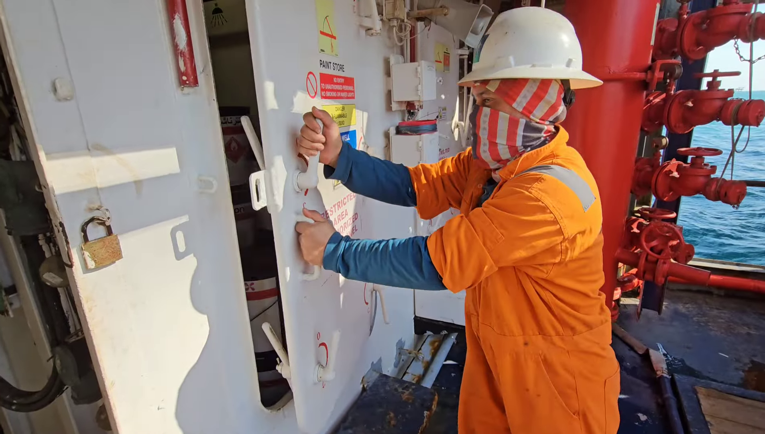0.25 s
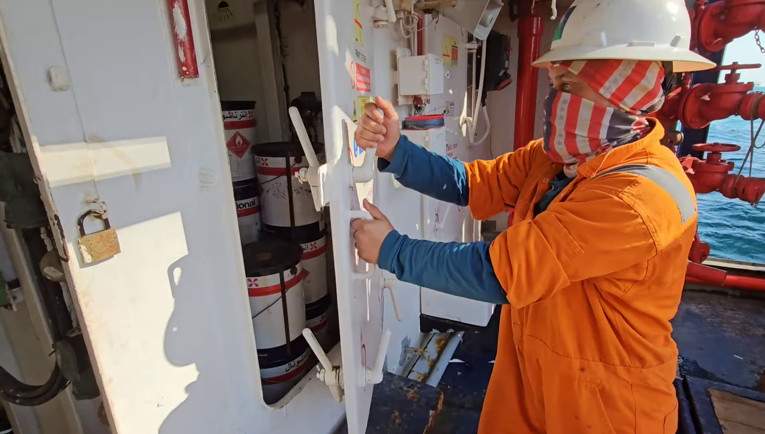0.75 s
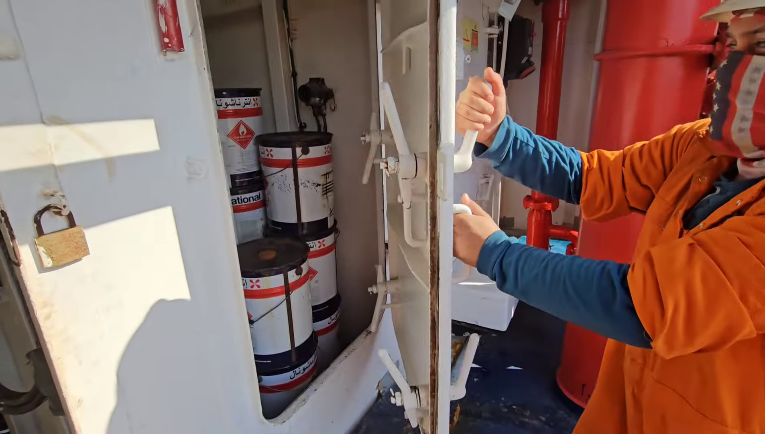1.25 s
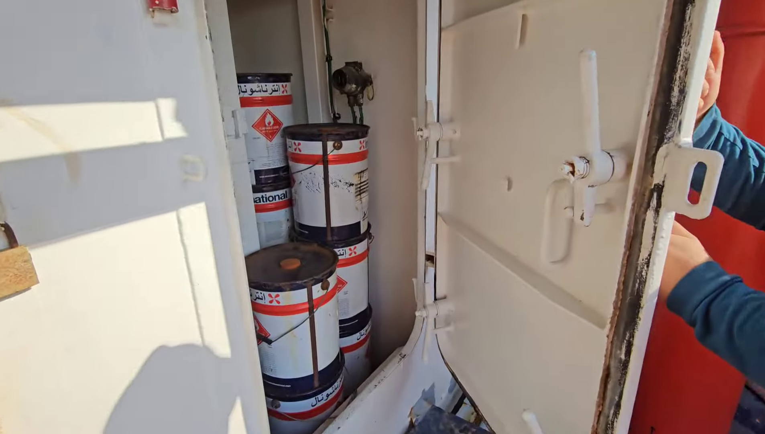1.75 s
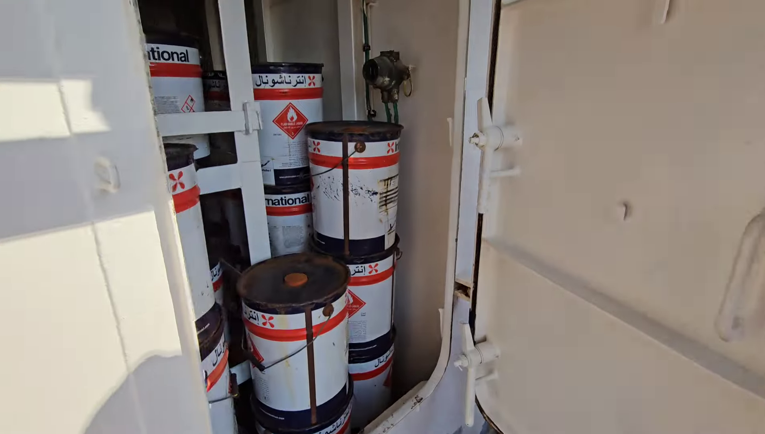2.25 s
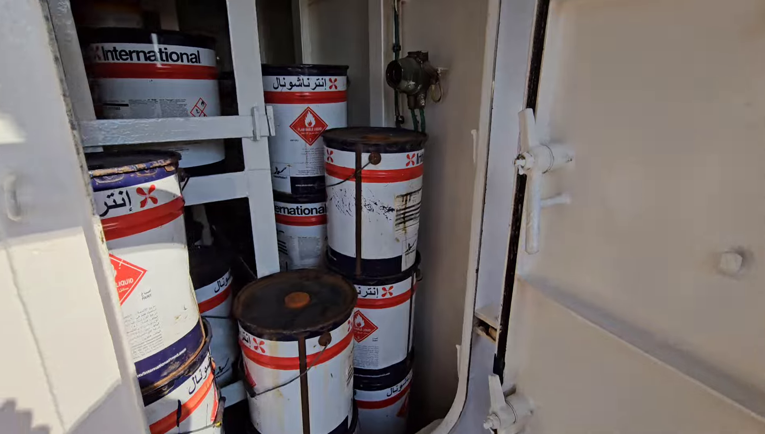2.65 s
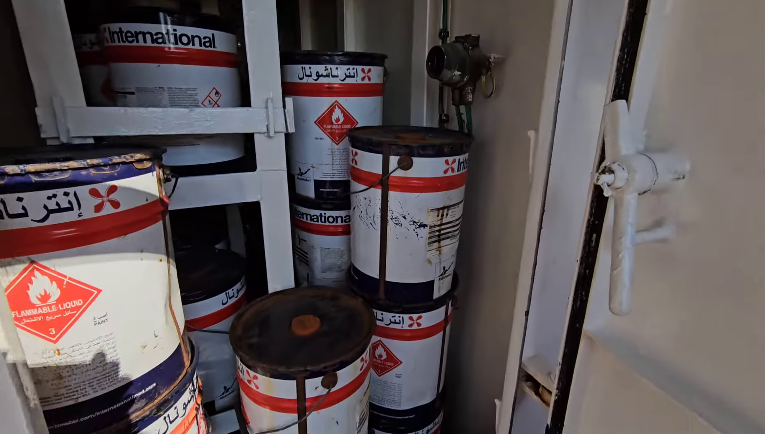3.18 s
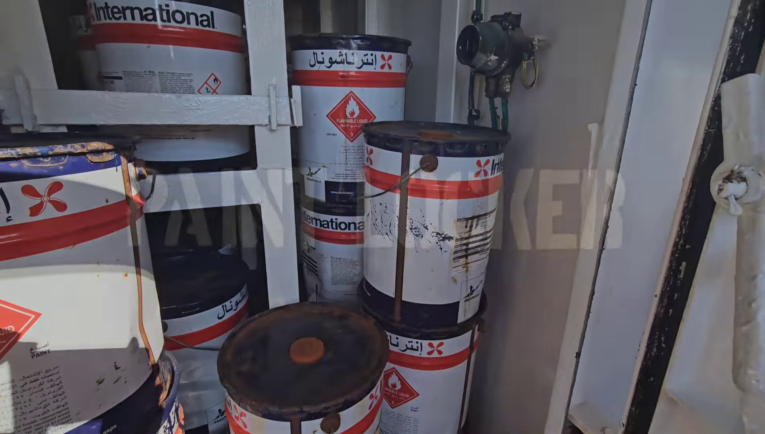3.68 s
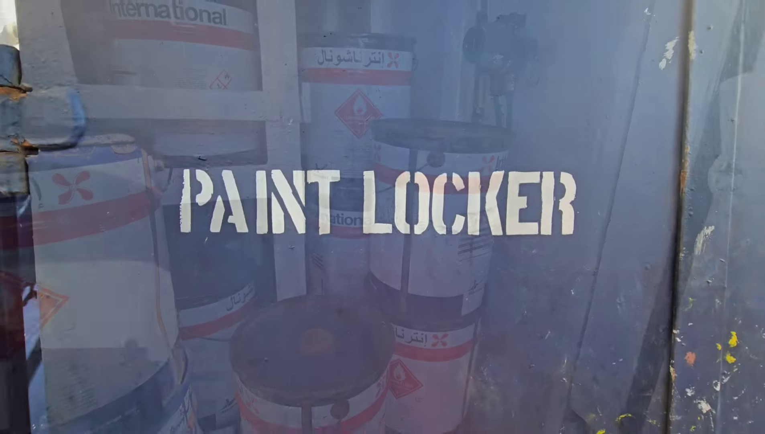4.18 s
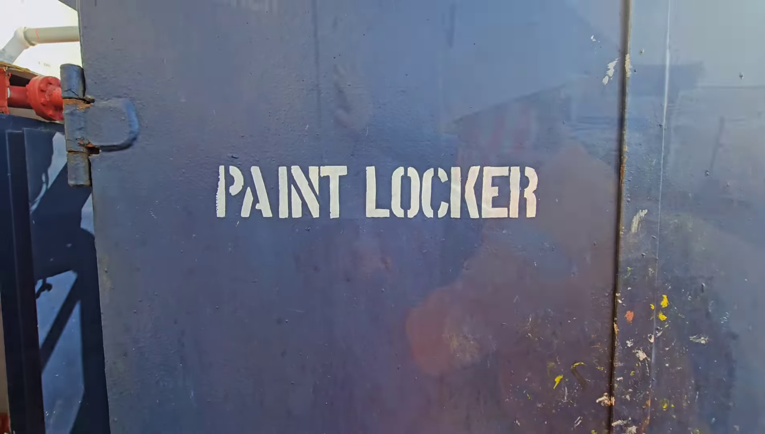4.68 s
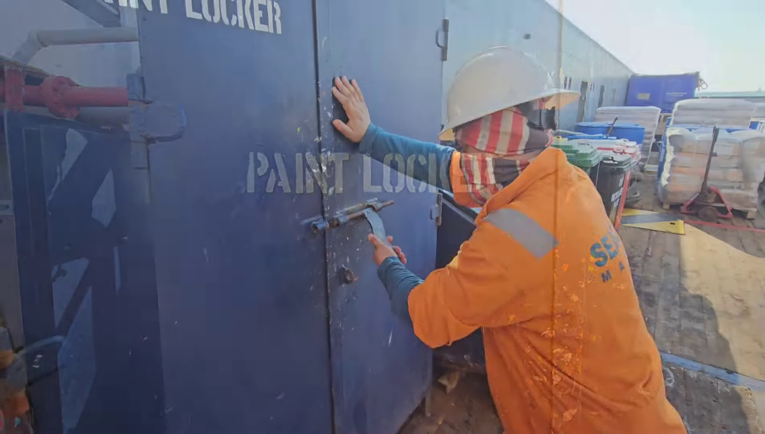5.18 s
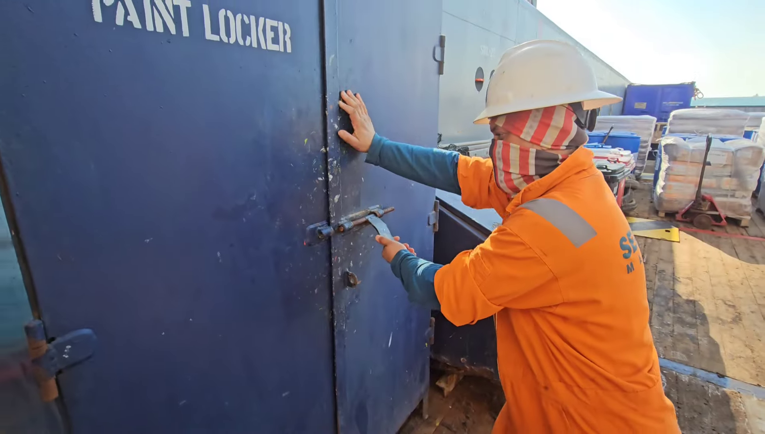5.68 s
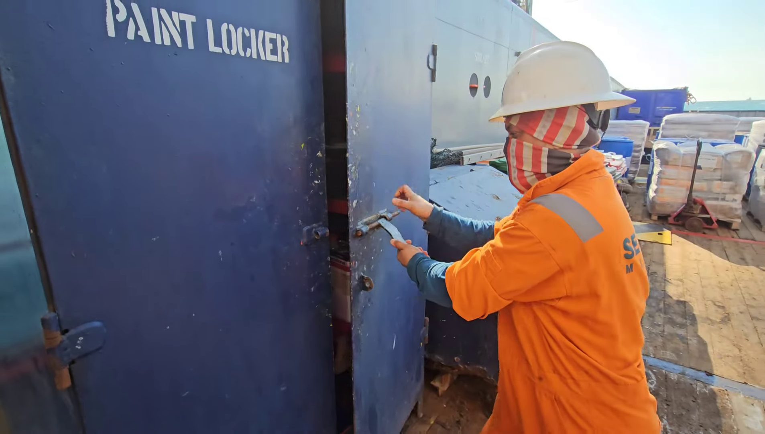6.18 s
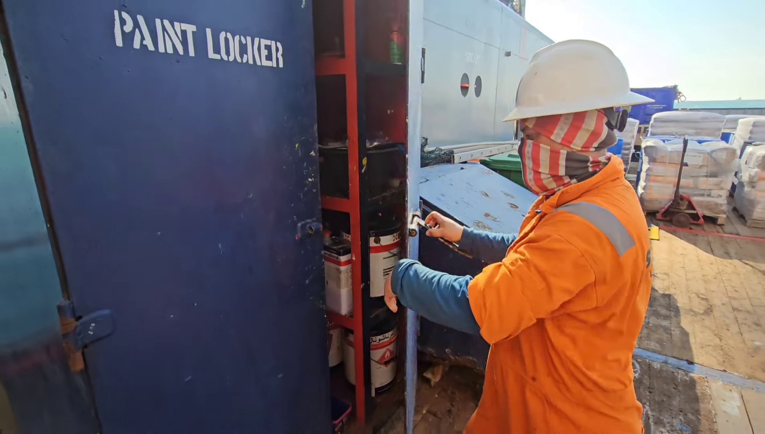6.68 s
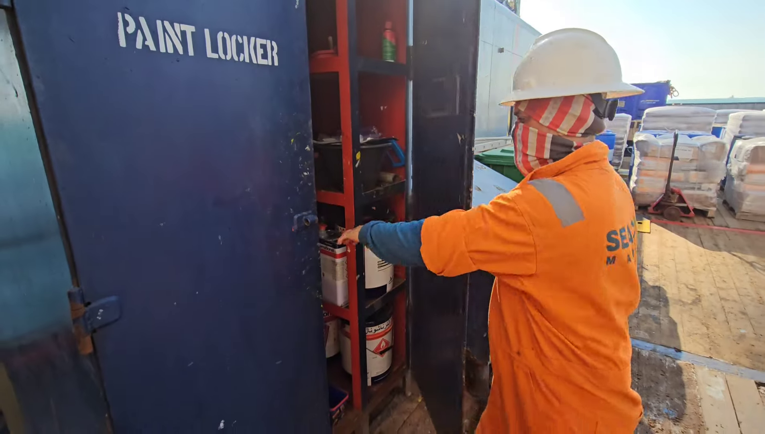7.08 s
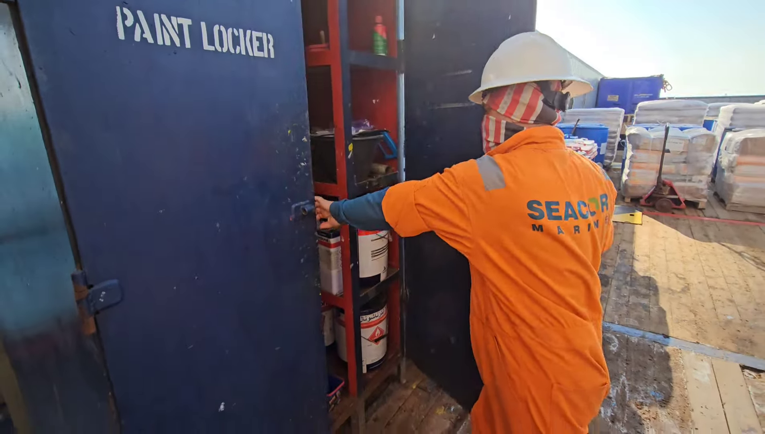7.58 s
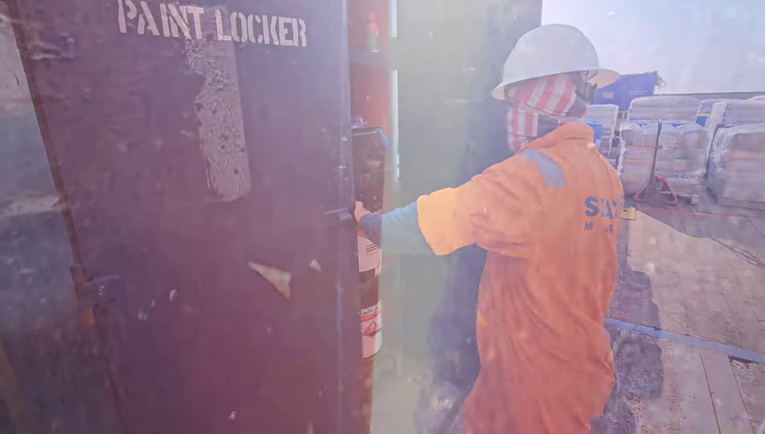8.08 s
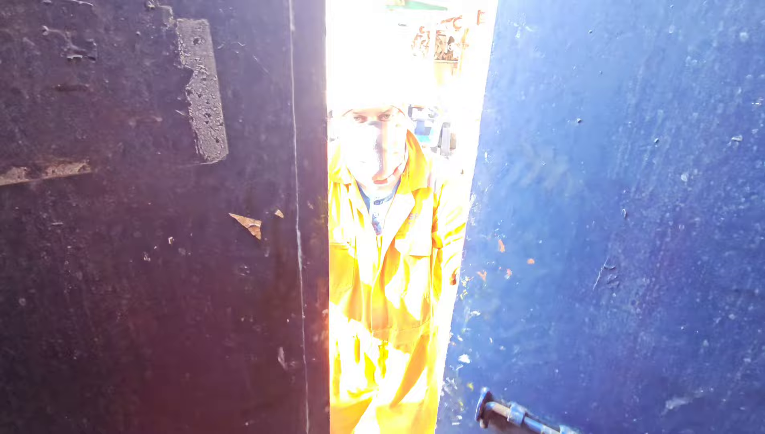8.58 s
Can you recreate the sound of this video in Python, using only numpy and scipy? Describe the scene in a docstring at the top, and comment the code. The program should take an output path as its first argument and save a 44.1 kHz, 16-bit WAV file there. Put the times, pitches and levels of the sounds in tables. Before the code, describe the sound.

A ship's deck with constant machinery, heard in wide stereo from four spots that crossfade smoothly. Throughout, two diesel engines hum very low, swelling and sinking about once a second over exhaust rumble, with fan rush, soft air hiss and wavering pump whines. The opening is slightly stronger, with a short pump tone around 1.3 s. At 2.8 s a heavy, low, grinding steel knock lands close by in a quick cluster, and the background dips. From 3.5 to 4.4 s it blends into a louder, fuller rumble and rush; from 4.7 to 5.5 s into a somewhat lighter, more whining spot. A faint high latch scrape rattles left at 5.25 s, then one tiny dry click at 5.5 s. Air hiss swells around 7 s. At 7.4 s a bolt clanks brightly, gritty and briefly ringing. From 7.8 s the sound fades into a duller, quieter hum until the end near 9 s.

```python
"""Deck of a ship, heard from four spots in turn, each fading into the next.
Two diesel engines hum near 62 Hz, two sine tones beating slowly over exhaust rumble of coloured noise.
Fans and pumps rush and hiss as coloured noise and whine as wavering tones.
At the steel lockers something knocks, a latch scrapes and a bolt clanks: contacts start clatter,
ringing modes and grit. One brief, dry click is a sudden jump in the signal that decays at once."""
import sys
import numpy as np
from scipy import signal
from scipy.fft import rfft, irfft, next_fast_len
from scipy.io import wavfile
from scipy.ndimage import uniform_filter1d, minimum_filter1d

SR = 44100
rng = np.random.default_rng(int(sys.argv[2]) if len(sys.argv) > 2 else 0)


def inscribe(sig):
    """Save sig as 16-bit PCM at rate SR to the path in sys.argv[1].

    A 1-D sig is mono; a 2-D sig holds one channel per row.
    Samples are clipped to [-1, 1] before scaling.
    """
    pcm = np.round(np.clip(np.atleast_2d(sig).T, -1, 1) * 32767)
    wavfile.write(sys.argv[1], SR, pcm.astype(np.int16))


N = 389844

# listening spots: (exhaust rumble [dB], fan rush [dB], air hiss [dB], octave of the firing tone [dB])
SPOT_LEVELS = [(-20.5, -28.5, -51, -33.5), (-14.5, -22.5, -44.5, -34), (-17.5, -26.5, -47.5, -30),
               (-21, -31, -57.5, -36.5)]
# starts of the fades to the second, third and fourth spot: (time [s])
FADE_STARTS_S = [3.53, 4.65, 7.77]
# air hiss spectrum per spot: (frequency [Hz], relative density [dB per Hz])
HISS_SPOT_1 = [(2940, -15), (5000, -1.5), (5870, -3), (7480, -3), (10500, -8), (11500, -6), (14000, -11),
               (14900, -14), (15500, -16)]
HISS_SPOT_2 = [(2940, -30), (5000, -2.5), (7370, -2.5), (9840, -10), (11800, -8.5), (14900, -16),
               (15500, -23)]
HISS_SPOT_3 = [(2940, -18), (5000, -0.5), (6310, -2), (6830, -4), (7410, -2.5), (10400, -9), (11700, -5.5),
               (14200, -11), (15500, -14)]
HISS_SPOT_4 = [(2940, -29), (5000, -10), (6010, -5), (6520, -8), (6960, -9), (10400, -19), (15500, -21)]
# fan rush spectrum per spot: (frequency [Hz], relative density [dB per Hz])
RUSH_SPOT_1 = [(240, -5.5), (400, -4), (459, 3.5), (515, 2), (617, 1.5), (715, -2.5), (821, -5),
               (912, -2.5), (1200, -11), (1310, -9.5), (1680, -14.5), (1950, -11.5), (2440, -19.5),
               (4310, -27), (5000, -33), (6500, -48), (11000, -120)]
RUSH_SPOT_2 = [(240, -47), (400, -14), (454, -1), (521, -4), (623, -6.5), (795, -13), (856, -13.5),
               (2100, -19.5), (3140, -30), (5000, -35.5), (6500, -66), (11000, -120)]
RUSH_SPOT_3 = [(240, -35), (400, -5), (459, 0), (494, -0.5), (567, -0.5), (650, -2.5), (731, -9),
               (865, -7.5), (1150, -13.5), (1270, -11.5), (1760, -16), (2170, -16.5), (2860, -25.5),
               (4400, -28.5), (5000, -37.5), (6500, -61), (11000, -120)]
RUSH_SPOT_4 = [(240, -35), (400, -3), (521, -8.5), (762, -20), (865, -15.5), (1130, -19.5), (1380, -18.5),
               (1790, -24.5), (5000, -39.5), (6500, -69), (11000, -120)]
# fan and pump tones per spot: (frequency [Hz], level relative to the rush [dB])
WHINES_SPOT_1 = [(86, -7), (153, -11), (207, -12), (296, -12), (322, -10), (331, -14), (374, -17),
                 (465, -17), (559, -17.5), (587, -21), (635, -13.5), (893, -14), (1049, -24), (1100, -25),
                 (1270, -23), (1311, -25), (1588, -27), (1783, -26), (1902, -29), (3564, -36)]
WHINES_SPOT_2 = [(330, -12), (447, -18), (505, -21), (560, -18), (632, -19), (678, -20), (878, -24),
                 (1270, -28)]
WHINES_SPOT_3 = [(88, -8), (107, -11), (204, -12), (230, -2), (246, -9), (318, -7), (374, -15), (465, -22),
                 (555, -18), (586, -16), (634, -14), (925, -20), (950, -21), (998, -24), (1663, -30),
                 (1900, -30), (3560, -37)]
WHINES_SPOT_4 = [(290, -7), (516, -12), (554, -12), (888, -16), (947, -20), (1329, -23), (3563, -34)]
# single pump tones that swell: (middle [s], half length [s], frequency [Hz], crest level [dB])
PUMP_SWELLS = [(1.29, 0.12, 322, -28), (3.6, 0.22, 247, -30), (4.7, 0.17, 330, -25.5),
               (4.62, 0.15, 445, -32), (7.72, 0.17, 320, -28.5)]
# exhaust rumble spectrum per spot: (frequency [Hz], relative density [dB per Hz])
RUMBLE_SPOT_1 = [(20, -19), (40, -5), (60, -2.5), (74, -4), (86, -0.5), (102, -3.5), (120, -6), (145, -6.5),
                 (200, -8), (245, -6.5), (280, -13.5), (330, -10), (400, -19.5), (480, -32)]
RUMBLE_SPOT_2 = [(20, -7), (48, -4.5), (76, 1.5), (100, 2), (135, -2.5), (165, -4.5), (212, 2.5),
                 (240, -1.5), (280, -5), (330, -7.5), (385, -9.5), (480, -52)]
RUMBLE_SPOT_3 = [(20, -9), (35, -16.5), (60, -1), (75, -7), (90, -1), (112, -3.5), (150, -11), (190, -7.5),
                 (230, 0.5), (280, -8), (325, -9), (400, -15.5), (480, -50)]
RUMBLE_SPOT_4 = [(20, -20), (40, -1), (50, 6), (74, -14), (84, -1.5), (98, -14), (130, -7), (180, -9),
                 (240, -15.5), (310, -10.5), (400, -29), (480, -44)]
# machinery level changes as each door swings:
# (middle [s], half length [s], rumble [dB], rush [dB], hiss [dB])
DOOR_SURGES = [(0.22, 0.49, 2, 2, 0), (4.55, 0.28, -2.1, 0.4, 0), (6.94, 0.57, 0, 0.3, 4)]
# engines drifting into step: (start [s], rise [s], crest level [dB])
HUM_SWELLS = [(0.08, 0.61, -13.5), (1.66, 0.63, -18), (2.86, 0.48, -18), (4.1, 0.63, -15.5),
              (5.0, 0.48, -18.5), (6.0, 0.39, -16.5), (7.08, 0.41, -19), (7.9, 0.23, -20), (8.52, 0.2, -25)]
# stereo width: (frequency [Hz], side to mid [dB])
SIDE_TO_MID = [(60, -18.5), (130, -20), (290, -12.5), (600, -5.5), (900, -0.5), (1400, 2), (2500, -1),
               (5000, 0.5), (15000, 0)]
# stereo balance: (frequency [Hz], left to right [dB])
LEFT_TO_RIGHT = [(100, 0.1), (600, 0.5), (1300, 2), (2100, 1), (3200, -2), (4200, -5), (6000, -3),
                 (12000, -0.5)]
# contacts of steel parts: (time [s], relative strength [dB], extra treble of a hard contact [dB])
KNOCK_CONTACTS = [(2.823, -22, -12), (2.832, -23.5, 1), (2.848, -15.5, 3), (2.856, -16.5, -1),
                  (2.867, -15, -5), (2.873, -17.5, -11), (2.896, -26, -5)]
LATCH_CONTACTS = [(5.241, -32, 1), (5.246, -30.5, -2), (5.254, -28.5, 1), (5.265, -31.5, -2),
                  (5.279, -38, -5)]
BOLT_CONTACTS = [(7.4295, -21.5, 3), (7.435, -20, -3), (7.444, -30, 4)]
KEEPER_CONTACTS = [(7.447, -33, 0), (7.459, -30, 0), (7.467, -34, 0), (7.481, -39, 0)]
# strong modes of each part: (frequency [Hz], relative level [dB], t60 [s])
KNOCK_RING = [(109, -2, 0.21), (186, -4, 0.17), (282, 3, 0.21), (465, -7, 0.2), (673, -6, 0.16),
              (935, -12, .18), (1440, -7, 0.12), (1870, -12, 0.16)]
LATCH_RING = [(1300, -12, .07), (1787, -7, 0.1), (2040, -3, 0.1), (2170, 0, 0.12), (2270, -5, .09),
              (3020, -10, 0.075), (3400, -13, .06), (4400, -13, .06)]
BOLT_RING = [(1275, -10, .2), (1812, 0.5, .11), (2020, -14, .13), (2560, -14, .08), (2900, -14, .09),
             (3060, -13, .09), (3180, -11, .12), (3410, -15, .11), (3705, -9, .13), (3840, -17, .1),
             (4800, -18, .13), (5000, -21, .13), (5230, -17, .13), (5530, -17, .13), (6607, -18, .12),
             (6860, -22, .13), (7150, -19, .13), (7947, -22, .13), (8480, -22, .1)]
KEEPER_RING = [(1370, -5, .18), (2083, -8, .25), (2430, -10, .15), (2593, 3, .19), (3320, -3, .15),
               (3868, -9, .2), (5112, -10, .16), (5605, -15, .18), (6750, -17, .17)]
# dense clatter around the modes: (frequency [Hz], relative density [dB per Hz])
KNOCK_DENSE = [(40, -12), (120, 9), (300, -0.5), (700, -5), (1000, -10.5), (1700, -11), (2600, -24),
               (4400, -23), (5500, -28.5), (6300, -45), (7300, -30), (9200, -38), (15000, -58)]
LATCH_DENSE = [(300, -20), (1200, -1), (2200, 0), (3200, -8), (4500, -13), (6000, -17), (9000, -23),
               (15000, -50)]
BOLT_DENSE = [(300, -8), (1000, -4), (2000, 6), (2400, -1), (3700, 4), (4400, -16), (5200, -4), (5950, -10),
              (6700, -4), (8200, -7), (9200, -21), (10200, -11), (13500, -21), (16000, -30)]

TIME = np.arange(N) / SR
SIZE = next_fast_len(N, True)
HZ = np.maximum(np.fft.rfftfreq(SIZE, 1 / SR), 1)
FADE_S, FADE_POWER = 0.85, 1.135
# first-spot rumble, rush, hiss and octave drop at the knock and return slowly
DIP_FALL_S, DIP_DB, DIP_RECOVERY_S = 0.071, -3, 3.0
AUXILIARY_HZ, AUXILIARY_DB = 68.8, -31
FIRING_HZ, SECOND_ENGINE_DB = 61.5, -2.5
OCTAVE_SWELL_S, OCTAVE_SWELL_HALF_S, OCTAVE_SWELL_DB = 8.14, 0.61, 4
CONTACT_RISE_S, GRAIN_HZ, CHATTER_HZ = 0.001, 140, 45
GRIT_SNAPS_PER_S = 700
RING_WIDTH = 0.85  # share of the deck's stereo width
CLICK_S, CLICK_JUMP_DB, CLICK_SNAP_HZ = 5.4689, -16, 4000
STOPBAND_HZ = 16000


def from_db(db):
    """Decibels to gain."""
    return 10 ** (np.asarray(db) / 20)


def rms_one(x):
    """Scale to unit rms."""
    return x / np.sqrt(np.mean(x ** 2) + 1e-20)


def gain_at(points, hz):
    """Gain of a (frequency [Hz], level [dB]) table on a log-frequency axis."""
    table_hz, db = np.transpose(points)
    return from_db(np.interp(np.log(hz), np.log(table_hz), db))


def drift(rate_hz, t=TIME):
    """Low-passed chance of rms 1, made at SR / 100 and read at the times t."""
    pole = np.exp(-200 * np.pi * rate_hz / SR)
    noise = rng.standard_normal(N // 100 + 2002)
    slow = signal.lfilter([1], [1, -2 * pole, pole * pole], noise)[2000:]  # settled part
    return np.interp(t * SR / 100, np.arange(len(slow)), rms_one(slow))


def bump(middle_s, half_s):
    """Bell curve of height 1."""
    return np.exp(-((TIME - middle_s) / half_s) ** 2)


def panned(x, pan_db):
    """Lean a sound to the left by pan_db."""
    return x * from_db([[pan_db / 2], [-pan_db / 2]])


def stereo_noise(spectrum, width, lean):
    """Coloured noise of rms 1 with skirts beyond its table; the ears share mostly the bass."""
    low_skirt = np.minimum(HZ / spectrum[0][0], 1) ** 2
    high_skirt = np.minimum(spectrum[-1][0] / HZ, 1) ** 10
    white = rfft(rng.standard_normal((2, SIZE), dtype=np.float32))
    mid, side = white * gain_at(spectrum, HZ) * low_skirt * high_skirt
    left, right = (mid + width * side) * lean, (mid - width * side) / lean
    return rms_one(irfft([left, right], SIZE)[:, :N])


def wavering_tone(hz, rate_hz, scatter, t=TIME):
    """Steady tone plus its shifting reflections off the steelwork; rms 1."""
    phase = (2 * np.pi * ((hz * t + rng.random()) % 1)).astype(np.float32)
    in_phase = (1 + scatter * drift(rate_hz, t)) * np.sin(phase)
    return rms_one(in_phase + scatter * drift(rate_hz, t) * np.cos(phase))


def spot_fades():
    """Gain of each spot: it fades in while the one before fades out."""
    arrived = [np.clip((TIME - s) / FADE_S, 0, 1) for s in FADE_STARTS_S]
    arrived = [np.ones(N)] + arrived + [np.zeros(N)]
    return np.array([(this * (1 - following)) ** FADE_POWER for this, following in zip(arrived, arrived[1:])])


def knock_dip():
    """Gain that drops quickly from the first knock contact and returns slowly."""
    age = np.maximum(TIME - KNOCK_CONTACTS[0][0], 0)
    return from_db(DIP_DB * np.minimum(age / DIP_FALL_S, 1) * np.exp(-age / DIP_RECOVERY_S))


def deck_noise(spectra, gains, field):
    """Broadband machine noise with its own colour and gain at each spot."""
    return sum(gain * stereo_noise(spectrum, *field) for gain, spectrum in zip(gains, spectra))


def air_hiss(gains, surge_db, field):
    """High turbulent noise of the ventilation air."""
    spectra = [HISS_SPOT_1, HISS_SPOT_2, HISS_SPOT_3, HISS_SPOT_4]
    return from_db(surge_db) * deck_noise(spectra, gains, field)


def fan_whines(gains, rate_hz, scatter):
    """Blade tones of each spot; the ears differ least in the bass."""
    out = np.zeros((2, N))
    for gain, whines in zip(gains, [WHINES_SPOT_1, WHINES_SPOT_2, WHINES_SPOT_3, WHINES_SPOT_4]):
        heard = gain > 0
        for hz, db in whines:
            mid = wavering_tone(hz, rate_hz, scatter, TIME[heard])
            side = wavering_tone(hz, rate_hz, 2 * scatter, TIME[heard]) * gain_at(SIDE_TO_MID, hz)
            out[:, heard] += gain[heard] * from_db(db) * rms_one(np.array([mid + side, mid - side]))
    return out


def fan_rush(gains, surge_db, field):
    """Fan noise and blade tones, wavering together in the breeze on deck."""
    breeze_db = 0.26 * drift(5.2)
    spectra = [RUSH_SPOT_1, RUSH_SPOT_2, RUSH_SPOT_3, RUSH_SPOT_4]
    fans = deck_noise(spectra, gains, field) + fan_whines(gains, rate_hz=2.23, scatter=0.42)
    return from_db(surge_db + breeze_db) * fans


def pump_tones(rate_hz, scatter):
    """Single pump tones that swell out of the rush and sink back."""
    return sum(from_db(db) * bump(s, half_s) * wavering_tone(hz, rate_hz, scatter)
               for s, half_s, hz, db in PUMP_SWELLS)


def auxiliary_hum():
    """Weaker, faster machine whose tone beats with the engines and makes the hum flutter."""
    return from_db(AUXILIARY_DB) * wavering_tone(AUXILIARY_HZ, rate_hz=1.8, scatter=0.37)


def exhaust_rumble(firing, gains, surge_db, field):
    """Low exhaust noise, leaving in one puff per firing."""
    puffs = 1 + 0.047 * np.cos(firing)
    spectra = [RUMBLE_SPOT_1, RUMBLE_SPOT_2, RUMBLE_SPOT_3, RUMBLE_SPOT_4]
    return from_db(surge_db) * puffs * deck_noise(spectra, gains, field)


def engine_octave(firing, level, shake_db):
    """Second harmonic of the firing tone, swelling late."""
    swell_db = OCTAVE_SWELL_DB * bump(OCTAVE_SWELL_S, OCTAVE_SWELL_HALF_S)
    return np.sqrt(2) * level * from_db(swell_db + shake_db * drift(4.5)) * np.sin(2 * firing)


def engine_hum(firing, shake_db, pan_db):
    """Two firing tones beat, the second gaining one cycle per swell; uneven combustion shakes the sum."""
    start, rise, crest_db = np.transpose(HUM_SWELLS)
    moments = np.sort(np.r_[start, start + rise])
    lead = np.pi * np.interp(TIME, moments, np.arange(len(moments)))  # half a cycle from trough to crest
    second = from_db(SECOND_ENGINE_DB)
    pair = (np.sin(firing) - second * np.sin(firing + lead)) / (1 + second)
    level_db = np.interp(TIME, start + rise, crest_db) + shake_db * drift(13.0)
    return panned(np.sqrt(2) * from_db(level_db) * pair, pan_db)


def dry_click(decay_s, snap_s):
    """A sudden jump in the signal that decays at once, with a bright snap on its edge."""
    age = np.maximum(TIME - CLICK_S, 0)
    snap = np.exp(-age / snap_s) * np.cos(2 * np.pi * CLICK_SNAP_HZ * age)
    return from_db(CLICK_JUMP_DB) * (age > 0) * (np.exp(-age / decay_s) + snap / 2)


def after(start_s):
    """The half second in which a blow dies away."""
    return slice(int(start_s * SR), int(start_s * SR) + SR // 2)


def dying(starts, db, t60, t):
    """Envelope of overlapping decays whose energies add; each builds up over CONTACT_RISE_S."""
    age = np.maximum(t - starts[:, None], 0)
    decays = from_db(db[:, None] - 60 * age / t60) * np.minimum(age / CONTACT_RISE_S, 1)
    return np.linalg.norm(decays, axis=0)


def clatter(contacts, spectrum, field, level_db, t60, treble_t60, treble_hz, grain_db):
    """Contacts excite dense modes, body and treble decaying separately; grinding faces make it grainy."""
    starts, db, hard_db = np.transpose(contacts)
    out, span = np.zeros((2, N)), after(starts[0])
    t = TIME[span]
    dense = stereo_noise(spectrum, *field)[:, span]
    body = signal.sosfiltfilt(signal.butter(2, treble_hz, fs=SR, output="sos"), dense)
    treble = dense - body
    grain = rms_one(from_db(grain_db * drift(GRAIN_HZ, t)))
    body_decay = dying(starts, db, t60, t)
    treble_decay = dying(starts, db + hard_db, treble_t60, t)
    out[:, span] = grain * (body_decay * body + treble_decay * treble)
    return from_db(level_db) * out


def ringing(contacts, modes, ring_db, rough):
    """Strong modes ring on, out of step between the ears; a loose part chatters and roughens them."""
    starts, db, _ = np.transpose(contacts)
    out, span = np.zeros((2, N)), after(starts[0])
    t = TIME[span]
    for hz, mode_db, t60 in modes:
        mid, side = (wavering_tone(hz, CHATTER_HZ, rough, t) for _ in range(2))
        side = side * gain_at(SIDE_TO_MID, hz) * RING_WIDTH
        ears = np.array([rms_one(mid + side), rms_one(mid - side)])
        out[:, span] += dying(starts, db + mode_db + ring_db, t60, t) * ears
    return out


def grit(contacts, low_hz, high_hz, level_db, t60):
    """Rust and paint crunch between steel faces: tiny separate snaps that die away after each contact."""
    starts, db, _ = np.transpose(contacts)
    out, span = np.zeros((2, N)), after(starts[0])
    t = TIME[span]
    struck = rng.random(len(t)) < GRIT_SNAPS_PER_S / SR
    snaps = struck * rng.choice([-1, 1], len(t)) * rng.uniform(0, 1, (2, len(t)))
    band = signal.butter(2, [low_hz, high_hz], "band", fs=SR, output="sos")
    crunch = signal.sosfilt(band, snaps + 1e-18)
    out[:, span] = dying(starts, db + level_db, t60, t) * rms_one(crunch)
    return out


def latch_scrape(field):
    """Light contacts rattle a latch and its high modes."""
    latch = clatter(LATCH_CONTACTS, LATCH_DENSE, field, level_db=0.6, t60=0.14,
                    treble_t60=0.12, treble_hz=5000, grain_db=1.5)
    latch += ringing(LATCH_CONTACTS, LATCH_RING, ring_db=-2, rough=0.5)
    return panned(latch, 6.5)


def bolt_clank(field):
    """A bolt shoots home and sets its keeper ringing."""
    bolt = clatter(BOLT_CONTACTS, BOLT_DENSE, field, level_db=-2, t60=0.22,
                   treble_t60=0.17, treble_hz=7000, grain_db=1.3)
    bolt += ringing(BOLT_CONTACTS, BOLT_RING, ring_db=-1.3, rough=0.4)
    bolt += ringing(KEEPER_CONTACTS, KEEPER_RING, ring_db=-4.8, rough=0.3)
    bolt += grit(BOLT_CONTACTS, low_hz=1900, high_hz=3800, level_db=-6, t60=0.11)
    return panned(bolt, 1.5)


def locker_knock(field):
    """A heavy, grinding knock with low modes and grit."""
    knock = clatter(KNOCK_CONTACTS, KNOCK_DENSE, field, level_db=0.6, t60=0.2,
                    treble_t60=0.2, treble_hz=900, grain_db=2.0)
    knock += ringing(KNOCK_CONTACTS, KNOCK_RING, ring_db=-5.5, rough=0.45)
    knock += grit(KNOCK_CONTACTS, low_hz=600, high_hz=1800, level_db=-10, t60=0.17)
    return panned(knock, 1.0)


def scene():
    """Engines and fans all around, small steel sounds close by."""
    field = gain_at(SIDE_TO_MID, HZ), np.sqrt(gain_at(LEFT_TO_RIGHT, HZ))
    fades = spot_fades()
    fades[0] *= knock_dip()
    rumble_gains, rush_gains, hiss_gains, octave_gains = [
        from_db(column)[:, None] * fades for column in np.transpose(SPOT_LEVELS)]
    rumble_db, rush_db, hiss_db = sum(
        np.outer(surge_db, bump(s, half_s)) for s, half_s, *surge_db in DOOR_SURGES)
    firing = 2 * np.pi * np.cumsum(FIRING_HZ + 0.11 * drift(1.17)) / SR  # phase [rad]
    air = air_hiss(hiss_gains, hiss_db, field) + fan_rush(rush_gains, rush_db, field)
    pumps = pump_tones(rate_hz=9, scatter=0.4)
    engines = auxiliary_hum() + exhaust_rumble(firing, rumble_gains, rumble_db, field)
    engines += engine_octave(firing, octave_gains.sum(axis=0), shake_db=1.0)
    engines += engine_hum(firing, shake_db=0.9, pan_db=1.0)
    click = dry_click(decay_s=0.00049, snap_s=0.00015)
    lockers = latch_scrape(field) + bolt_clank(field) + locker_knock(field)
    return air + pumps + engines + click + lockers


def record(dry):
    """A limiter holds peaks down, the top is cut steeply and the ends are eased."""
    window = SR // 100
    room = np.minimum(1, 0.9 / (np.abs(dry).max(axis=0) + 1e-9))
    gain = uniform_filter1d(minimum_filter1d(room, window), window)
    ends = np.minimum(1, np.minimum(TIME, TIME[-1] - TIME) / 0.004)
    top_cut = signal.cheby2(18, 60, STOPBAND_HZ, fs=SR, output="sos")
    return signal.sosfilt(top_cut, dry * gain) * ends


dry = scene()
out = record(dry)
inscribe(out)
```